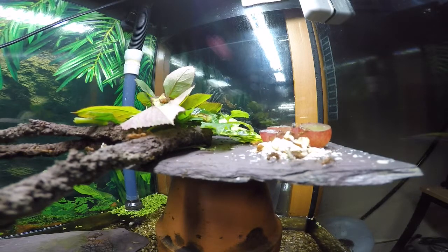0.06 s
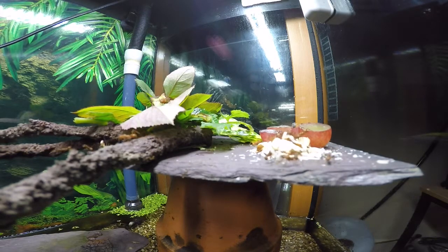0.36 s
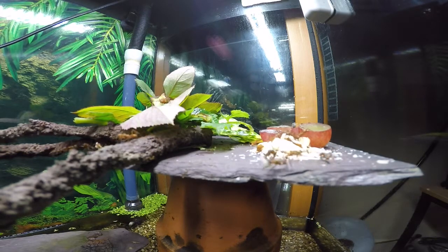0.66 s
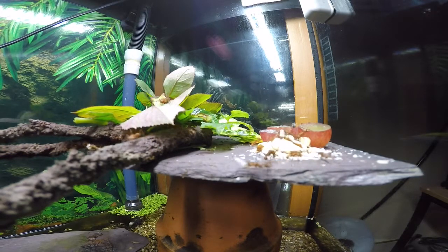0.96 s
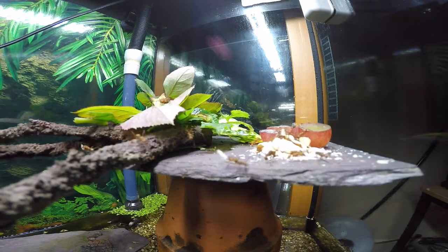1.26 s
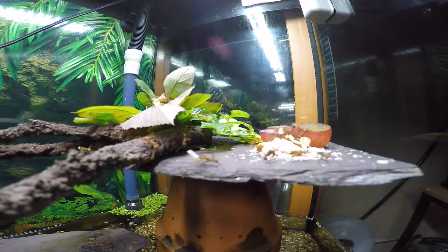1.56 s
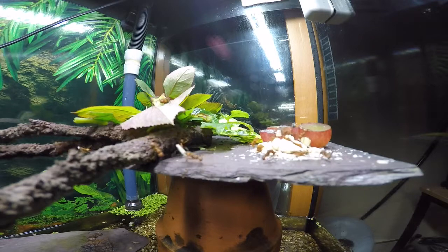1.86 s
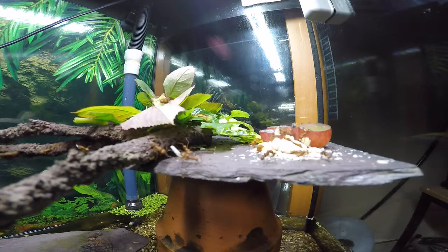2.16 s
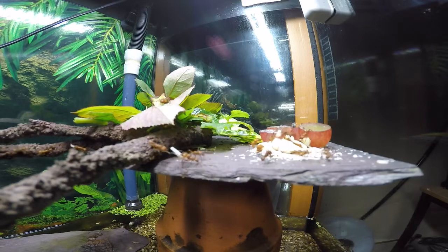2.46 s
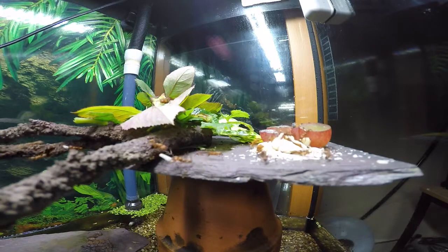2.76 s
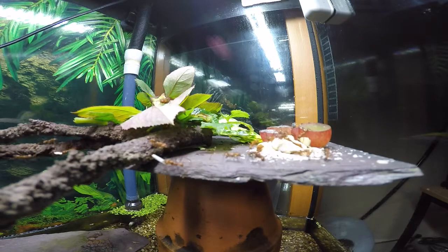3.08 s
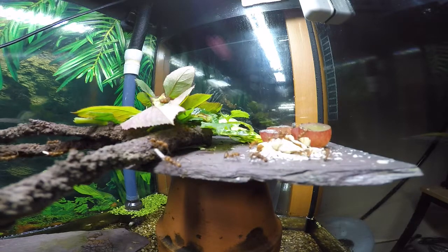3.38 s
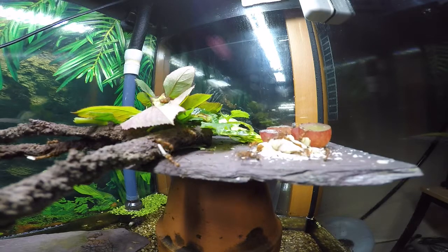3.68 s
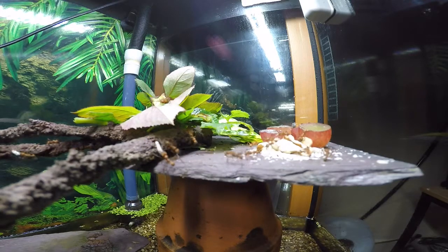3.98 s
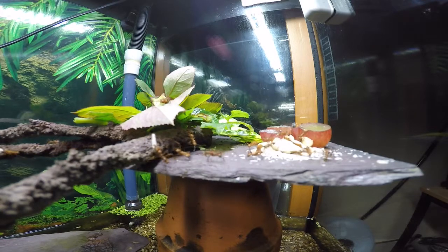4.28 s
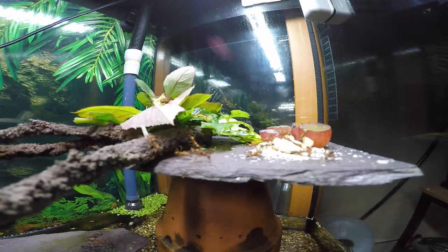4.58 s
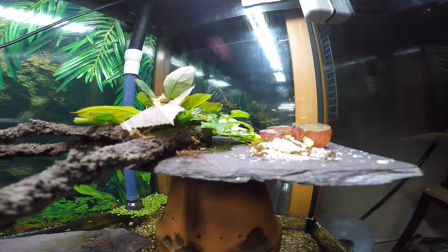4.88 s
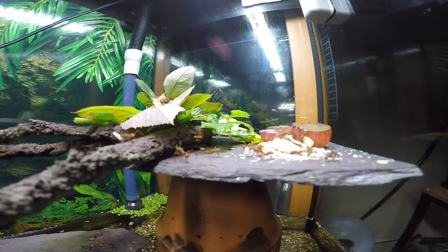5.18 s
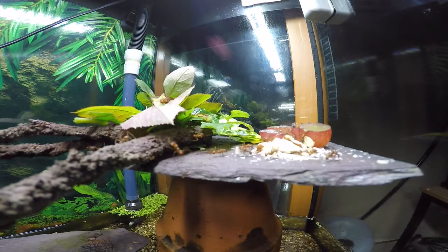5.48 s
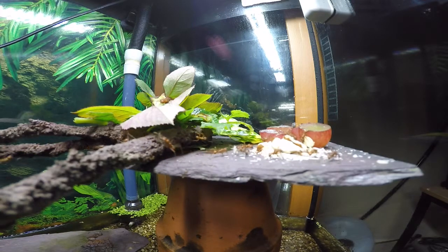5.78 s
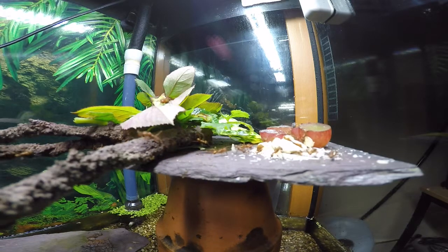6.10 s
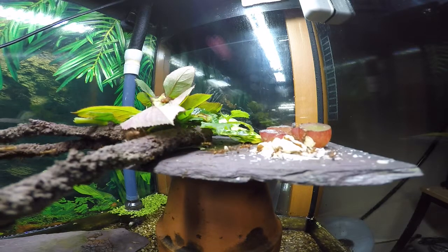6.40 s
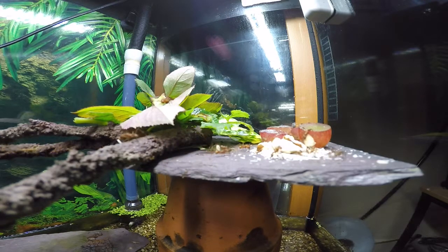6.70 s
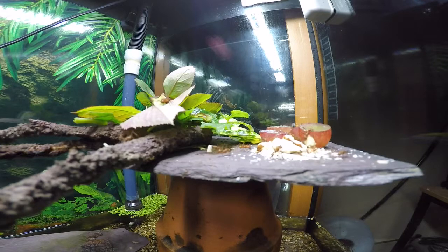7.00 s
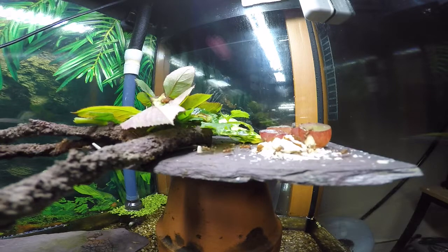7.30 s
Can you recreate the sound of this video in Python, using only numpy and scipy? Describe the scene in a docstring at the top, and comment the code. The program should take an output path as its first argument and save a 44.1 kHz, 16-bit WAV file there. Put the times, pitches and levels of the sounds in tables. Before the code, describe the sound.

Inside a quiet glass plant tank, small drops fall into shallow water at irregular moments. Each makes a tiny splash and a rising plink with a very short echo, and the clearest come in the second half, along with two tiny ticks. A low pump hum swells slowly underneath, with room rumble, hiss and a soft, regular electrical putter.

```python
"""Drips fall into shallow water in a quiet glass plant tank, heard from inside.
Each drop splashes and traps a bubble that rings with rising pitch; drips and two tiny ticks
echo briefly between the panes. A pump hums and makes the tank boom in slow swells.
Behind it: room rumble, electronic hiss and a soft, strictly regular electrical putter."""
import sys
import numpy as np
from scipy import signal
from scipy.fft import irfft
from scipy.io import wavfile
from scipy.ndimage import uniform_filter1d

SR = 44100
rng = np.random.default_rng(int(sys.argv[2]) if len(sys.argv) > 2 else 0)


def unload_audio(sound):
    """Save the sound as a 16-bit wav file, at the path given as the first command line argument."""
    columns = np.transpose(np.atleast_2d(sound))
    # keep every value between -1 and 1, then stretch to whole-number steps
    steps = np.round(np.clip(columns, -1, 1) * 32767)
    wavfile.write(sys.argv[1], SR, steps.astype(np.int16))


N = 328545
TIME = np.arange(N) / SR
FREQS = np.fft.rfftfreq(N, 1 / SR)


def from_db(db):
    """Decibels to gain."""
    return 10 ** (np.asarray(db) / 20)


def rms_one(x):
    """Scale to unit rms."""
    return x / np.sqrt(np.mean(x ** 2) + 1e-20)


def filtered(x, hz, kind, order=2):
    """Causal Butterworth filter."""
    sos = signal.butter(order, np.clip(hz, 10, .45 * SR), kind, fs=SR, output="sos")
    return signal.sosfilt(sos, x)


def resonate(x, hz, width_hz):
    """Two-pole resonator, unit peak gain."""
    radius = np.exp(-np.pi * width_hz / SR)
    feedback = [1, -2 * radius * np.cos(2 * np.pi * hz / SR), radius ** 2]
    return signal.lfilter((1 - radius ** 2) / 2 * np.array([1, 0, -1]), feedback, x)


def noise(spectrum):
    """Unit-rms noise with the given spectral shape."""
    return rms_one(irfft(spectrum * np.exp(2j * np.pi * rng.random(len(FREQS))), N))


def resonant_noise(hz, width_hz):
    """Unit-rms noise in a steep-sided resonance."""
    return noise(1 / (1 + (2 * (FREQS - hz) / width_hz) ** 2))


def fade(t, t60_s):
    """Exponential decay, 60 dB down at t60_s."""
    return np.exp(-np.log(1000) * t / t60_s)


def add(track, start_s, sound):
    """Mix a short sound into a track."""
    start = int(np.clip(start_s * SR, 0, N - 1))
    track[start:start + len(sound)] += sound[:N - start]


# Room rumble and hiss. Each row: frequency in Hz, relative spectral density in dB.
FLOOR_SPECTRUM = [(15, 0.5), (35, 0), (62, 1.5), (112, -7.5), (190, -17.5), (300, -21.5), (500, -24.5),
                  (1000, -30.5), (2000, -32.5), (4000, -34.5), (7500, -40), (11700, -43.5), (13500, -41.5),
                  (15000, -47)]
# Tank resonances and faint hiss bands. Each row: centre in Hz, width in Hz, rms level in dB.
FLOOR_BANDS = [(14.16, 0.64, -49.5), (160, 18, -69.5), (4810, 330, -85), (9500, 590, -88)]


def rumble_and_hiss(broadband_db=-51.5):
    """Steady room rumble and electronic hiss, with a few resonances standing out."""
    knots_hz, knots_db = np.transpose(FLOOR_SPECTRUM)
    shape_db = np.interp(np.log(FREQS + 1), np.log(knots_hz), knots_db)
    broadband = from_db(broadband_db) * noise(from_db(shape_db))
    bands = sum(from_db(db) * resonant_noise(hz, width_hz) for hz, width_hz, db in FLOOR_BANDS)
    return broadband + bands


def putter(first_s=.026, period_s=.1024, burst_s=0.002, burst_db=-46.5, scatter_db=1.0):
    """Short bursts of current, as from a radio beacon, leak in as dull blips."""
    out = np.zeros(N)
    burst = np.clip((burst_s - TIME[:SR // 100]) * SR, 0, 1)
    for start_s in np.arange(first_s, N / SR, period_s):
        add(out, start_s, from_db(burst_db + scatter_db * rng.standard_normal()) * burst)
    return filtered(filtered(out, hz=120, kind="high"), hz=450, kind="low")


# Mains hum partials. Each row: frequency in Hz, rms level in dB.
HUM_PARTIALS = [(50, -48.5), (100, -48), (150, -66), (450, -84)]
# Bell-shaped swells of the tank's boom. Each row: centre in seconds, length in seconds, lift in dB.
BOOM_SWELLS = [(.35, 0.74, 3), (1.116, 0.55, 9.5), (2.377, 0.17, 5.5), (3.635, 0.42, 7.5),
               (5.22, 0.33, 4.5), (5.79, 0.62, 8), (7.2, 0.68, 6)]


def pump(boom_hz=72.8, boom_width_hz=13.2, rest_db=-50.5, steadiness=0.79):
    """The pump hums with the mains; its vibration makes the tank boom."""
    hum = sum(from_db(db) * np.sqrt(2) * np.sin(2 * np.pi * (hz * TIME + rng.random()))
              for hz, db in HUM_PARTIALS)
    boom = resonant_noise(boom_hz, boom_width_hz)
    slow_level = np.sqrt(uniform_filter1d(boom ** 2, SR // 5) + 1e-9)
    even_boom = rms_one(boom / slow_level ** steadiness)  # less drift, same quick flutter
    swell_db = sum(lift_db * np.exp(-(2 * (TIME - centre_s) / length_s) ** 2)
                   for centre_s, length_s, lift_db in BOOM_SWELLS)
    return hum + from_db(rest_db + swell_db) * even_boom


# Reflections off the glass. Each row: delay in seconds, linear gain.
PANE_ECHOES = [(.0031, .35), (.0068, .35), (0.0085, .3)]


def tank_reverb(x, t60_s=0.16, tail_db=1.5, build_s=0.0023):
    """Direct sound, first reflections off the panes and a short, dense tail."""
    t = TIME[:SR // 2]
    tail = rng.standard_normal(len(t)) * fade(t, t60_s) * (1 - np.exp(-t / build_s))
    response = from_db(tail_db) * tail / np.linalg.norm(tail)
    response[0] += 1
    for delay_s, gain in PANE_ECHOES:
        add(response, delay_s, np.array([gain]))
    return signal.fftconvolve(x, response)[:N]


# Tiny ticks. Each row: start in seconds, pitch in Hz, dry onset level in dB.
TICK_EVENTS = [(5.819, 6200, -64), (7.399, 8600, -57.5)]


def ticks(t60_s=0.017, edge_ratio=1.046):
    """Small hard contacts: a narrow, bright ring that dies at once."""
    out, t = np.zeros(N), TIME[:SR // 10]
    for start_s, hz, db in TICK_EVENTS:
        band_hz = [hz / edge_ratio, hz * edge_ratio]
        ring = filtered(rng.standard_normal(len(t)), band_hz, "band", order=1)
        add(out, start_s, from_db(db) * rms_one(ring) * fade(t, t60_s))
    return out


# Modes rung by a splash. Each row: centre in Hz, width in Hz, relative gain in dB.
SPLASH_RESONANCES = [(500, 280, 5.5), (1090, 63, 9), (1490, 95, -15), (2450, 1800, -4.5), (3590, 200, 2.5),
                     (4900, 980, -22)]
# Falling drops. Each row: start in seconds, initial bubble pitch in Hz, rise in octaves,
# bubble gain in dB, splash gain in dB.
DRIP_EVENTS = [(0.237, 1720, .03, -59.5, -82), (1.351, 1445, 0.26, -58, -77),
               (1.4124, 1400, 0.88, -58.5, -53), (2.3186, 1895, 0.077, -45.5, -59),
               (2.322, 2070, .4, -50, -57), (2.860, 785, .44, -56.5, -60), (2.864, 1490, 0.11, -54, -75),
               (2.872, 2160, .25, -52, -62), (5.2893, 2585, 0.26, -39, -63), (5.2905, 2220, 0.24, -47, -68),
               (5.293, 3153, 0.37, -42.5, -67), (5.436, 2540, 0.16, -45, -51), (6.809, 2460, .11, -54, -77),
               (7.4365, 2600, .1, -50, -55), (7.442, 2210, .08, -42, -60)]


def drips(rise_cycles=14, ring_cycles=95, splash_t60_s=0.059, cutoff_ratio=2.25, attack_s=0.00058):
    """Each drop splashes; its trapped bubble rings and rises in pitch as it nears the surface."""
    out, t = np.zeros(N), TIME[:SR // 5]
    attack = 1 - np.exp(-t / attack_s)
    for start_s, hz, rise_octaves, bubble_db, splash_db in DRIP_EVENTS:
        # Timed in cycles, so small bubbles rise and die sooner.
        pitch_hz = hz * 2 ** (rise_octaves * (1 - np.exp(-t * hz / rise_cycles)))
        bubble = np.sin(2 * np.pi * np.cumsum(pitch_hz) / SR) * fade(t, ring_cycles / hz)
        spray = sum(from_db(db) * resonate(rng.standard_normal(len(t)), mode_hz, width_hz)
                    for mode_hz, width_hz, db in SPLASH_RESONANCES)
        # Bigger drop: lower bubble, duller splash.
        splash = rms_one(filtered(spray, cutoff_ratio * hz, "low")) * fade(t, splash_t60_s)
        add(out, start_s, (from_db(bubble_db) * bubble + from_db(splash_db) * splash) * attack)
    return out


def scene():
    """Drips and ticks in the tank over pump, noise floor and putter; mono."""
    mix = tank_reverb(drips() + ticks()) + pump() + rumble_and_hiss() + putter()
    return mix[None, :]


def record(dry, cutoff_hz=15250):
    """Steep elliptic low-pass."""
    return signal.sosfilt(signal.ellip(12, .1, 80, cutoff_hz, fs=SR, output="sos"), dry)


dry = scene()
out = record(dry)
unload_audio(out)
```